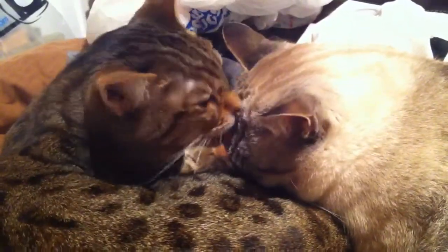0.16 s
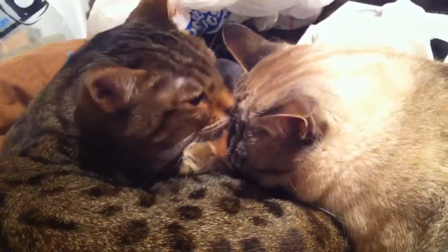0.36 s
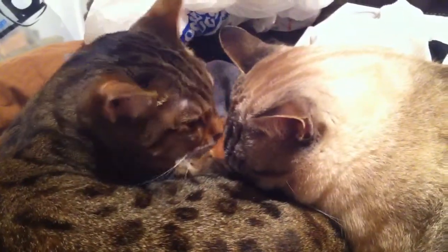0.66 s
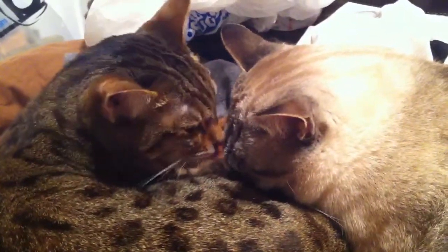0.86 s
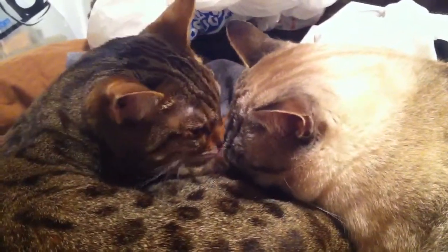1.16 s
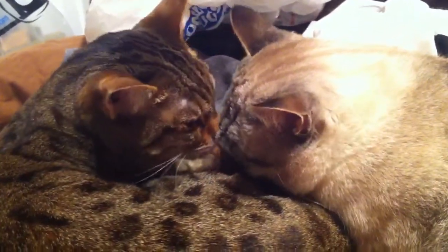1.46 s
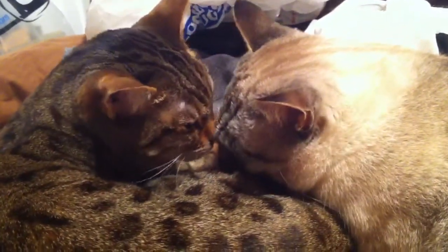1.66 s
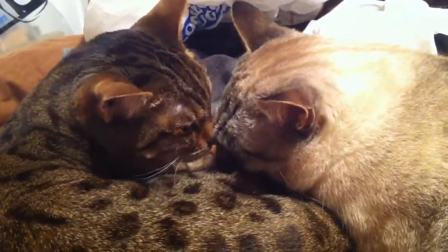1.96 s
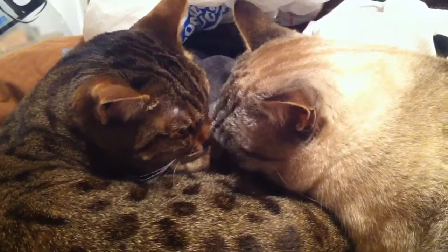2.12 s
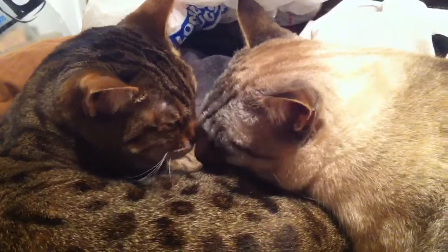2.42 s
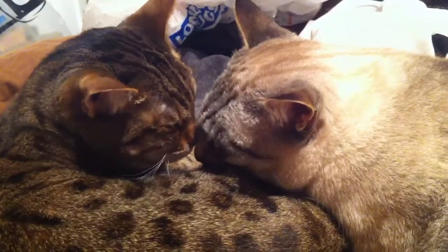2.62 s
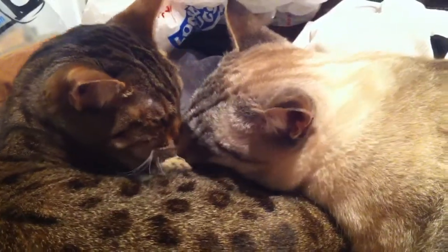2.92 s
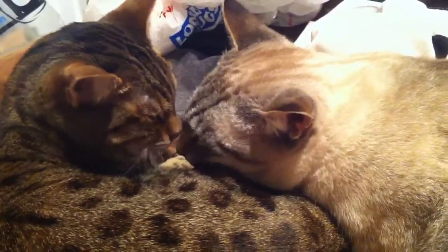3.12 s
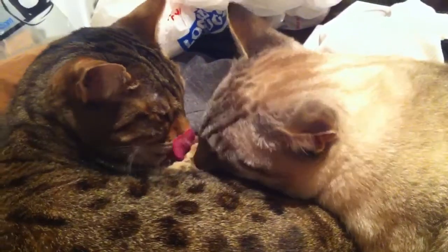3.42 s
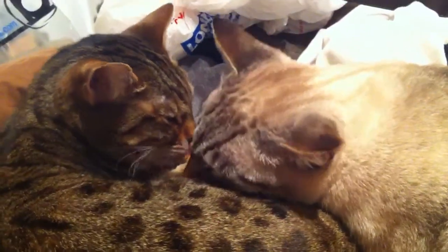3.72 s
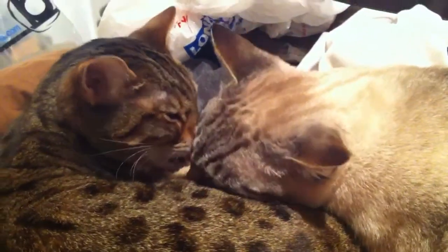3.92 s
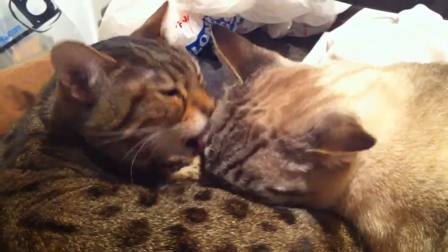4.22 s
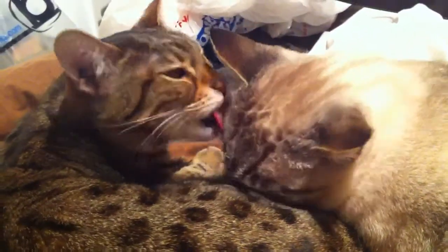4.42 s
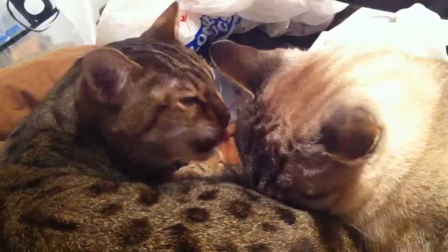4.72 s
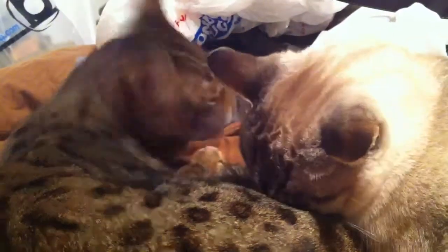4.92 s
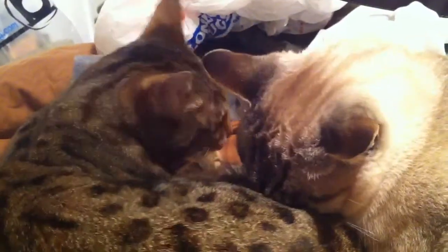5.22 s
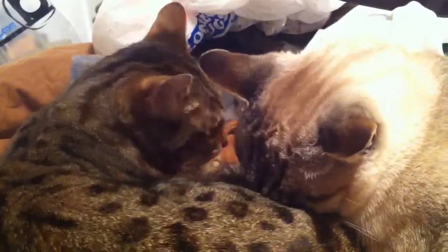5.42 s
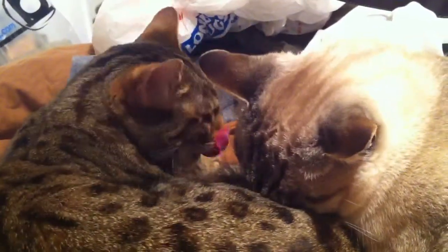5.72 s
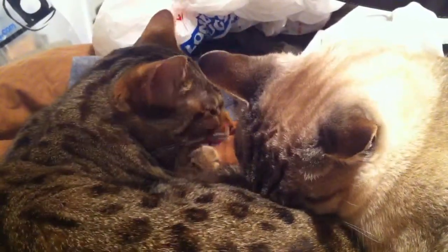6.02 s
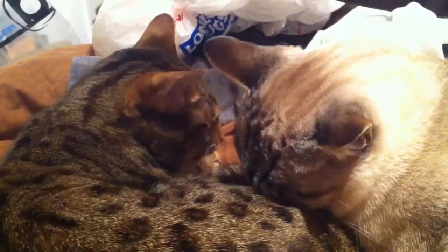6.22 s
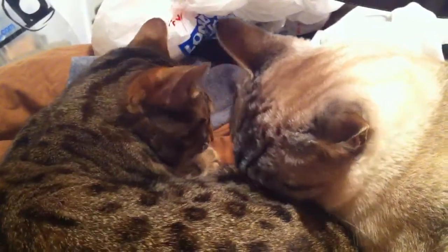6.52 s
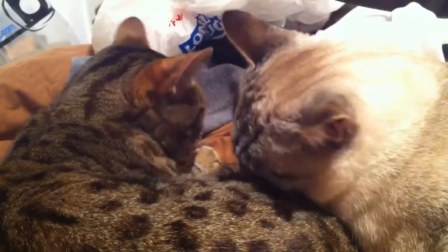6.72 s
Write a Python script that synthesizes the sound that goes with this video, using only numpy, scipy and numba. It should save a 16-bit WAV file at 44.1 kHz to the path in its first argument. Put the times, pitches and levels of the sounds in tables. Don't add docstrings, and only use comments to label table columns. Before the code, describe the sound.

Two cats lick fur with short wet rasping strokes close to the microphone, in a small soft room with a low steady motor hum.

```python
import sys
import numpy as np
from scipy import signal
from scipy.fft import rfft, irfft
from scipy.io import wavfile
from scipy.ndimage import uniform_filter1d
from numba import njit

SR = 44100
rng = np.random.default_rng(int(sys.argv[2]) if len(sys.argv) > 2 else 0)


def put_to_file(sound):
    columns = np.atleast_2d(sound).T
    safe = np.clip(columns, -1, 1)
    whole_steps = np.round(safe * 32767)
    wavfile.write(sys.argv[1], SR, whole_steps.astype(np.int16))


def volts_from_decibels(level):
    exponent = np.asarray(level, float) / 20
    return 10 ** exponent


N = 302967
LONGEST_S = 0.6


def unit(x):
    return x / np.sqrt(np.mean(x ** 2))


def coloured(points, size):
    hz, db = np.transpose(points)
    bins = np.maximum(np.fft.rfftfreq(size, 1 / SR), 1)
    gain = volts_from_decibels(np.interp(np.log(bins), np.log(hz), db))
    return unit(irfft(rfft(rng.standard_normal(size)) * gain, size))


def walk(rate, size):
    hold = int(SR / rate)
    steps = np.repeat(rng.standard_normal(size // hold + 1), hold)
    return unit(uniform_filter1d(steps, hold)[:size])


def place(sound, start_s):
    out = np.zeros(N + len(sound))
    out[int(start_s * SR):][:len(sound)] = sound
    return out[:N]


@njit
def resonance(x, hz, width):
    y, band, low = np.empty(len(x)), 0., 0.
    for i in range(len(x)):
        g = np.tan(np.pi * hz[i] / SR)
        k = width / hz[i]
        v = (band + g * (x[i] - low)) / (1 + g * (g + k))
        band = 2 * v - band
        low = low + 2 * g * v
        y[i] = k * v
    return y


def cavity(hz, width_hz):
    rough_db, slips_per_s, skirt = 1.4, 180, 2.5
    rub = rng.standard_normal(len(hz)) * volts_from_decibels(rough_db * walk(slips_per_s, size=len(hz)))
    ringing = resonance(rub, hz, 1. * width_hz)
    for _ in range(2):
        ringing = resonance(ringing, hz, skirt * width_hz)
    return unit(ringing)


def swell(start_s, length_s, hz, width_hz, level_db):
    t = np.arange(0, LONGEST_S, 1 / SR)
    shape = np.sin(np.pi * np.minimum(t / length_s, 1))
    hiss = cavity(np.full(len(t), 1. * hz), width_hz)
    return place(volts_from_decibels(level_db) * shape * hiss, start_s)


def air():
    # pitch_hz [Hz], level_db [dB per Hz]
    air_colour = [(20, -42), (55, -27.5), (85, -30.5), (110, -15), (145, -19), (220, -11.5), (380, -10),
                  (520, -17.5), (1650, -18), (3400, -28.5), (8000, -33), (10600, -36), (12500, -35.5),
                  (15700, -33.5)]
    return volts_from_decibels(-61.5 + 0.48 * walk(2.0, size=N)) * coloured(air_colour, size=N)


def hum():
    # multiple [of the base pitch], level_db [dB]
    hum_tones = [(1, -80), (2, -57), (3, -62.5), (4, -67.5), (5, -73.5), (6, -78.5), (7, -86), (9, -79.5)]
    motor_hz, turn_rad = 110.55, 0.25
    phase = 2 * np.pi * motor_hz * np.cumsum(1 + 0.001222 * walk(1.456, size=N)) / SR
    total = np.zeros(N)
    for multiple, level_db in hum_tones:
        gain = np.sqrt(2) * volts_from_decibels(level_db + 0.142 * multiple * walk(2.54, size=N))
        total += gain * np.sin(round(multiple) * phase + turn_rad)
    return total


def stirrings():
    # start_s [s], length_s [s], pitch_hz [Hz], width_hz [Hz],
    # level_db [dB]
    stirs = [
        (1.85, .55, 2430, 450, -71.5),
        (2.45, .35, 2150, 710, -75),
        (5.7, .35, 1800, 1700, -72),
        (6.6, .1, 1640, 100, -72),
        (2.63, .06, 3430, 150, -75),
        (2.62, .07, 4650, 250, -77),
    ]
    return sum(swell(*stir) for stir in stirs)


def squeak():
    start_s, length_s, pitch_hz, level_db = 2.635, 0.1, 1180, -66
    t = np.arange(0, length_s, 1 / SR)
    shape = np.sin(np.pi * t / length_s)
    return place(np.sqrt(2) * volts_from_decibels(level_db) * shape * np.sin(2 * np.pi * pitch_hz * t), start_s)


def mouth_rings():
    # start_s [s], length_s [s], pitch_hz [Hz], width_hz [Hz], level_db [dB]
    rings = [(0, 0.044, 6150, 250, -56.5), (1.19, 0.058, 7100, 1300, -44),
             (1.194, 0.058, 9700, 1700, -49.5), (1.202, 0.055, 4500, 870, -42),
             (1.336, .13, 4860, 1000, -61.5), (1.352, 0.072, 7550, 600, -58), (1.684, .05, 7070, 900, -44),
             (1.69, 0.074, 9140, 1500, -46.5), (1.694, 0.056, 14100, 700, -59),
             (1.698, 0.1, 9300, 1500, -50.5), (1.709, 0.053, 5520, 600, -29.5),
             (5.159, 0.12, 4270, 500, -58), (5.22, 0.045, 3690, 180, -46.5), (5.235, 0.082, 1950, 700, -59),
             (5.576, 0.022, 3900, 250, -40), (1.336, 0.047, 3560, 250, -45.5),
             (0.092, 0.023, 4100, 500, -49), (5.415, .14, 7900, 720, -59), (5.428, .08, 13000, 1000, -66),
             (5.492, 0.13, 3200, 81, -50.5), (5.552, 0.1, 4420, 250, -57.5),
             (5.546, 0.076, 15100, 700, -70), (5.567, 0.1, 7700, 1700, -65)]
    return sum(swell(*ring) for ring in rings)


def lick(stroke, lands_hz, curls_hz, balance_db, mouth, pockets_hz):
    # pitch_hz [Hz], level_db [dB]
    hair_colour = [(1300, -35), (2000, -5.5), (4000, -2), (7000, 2), (10000, -6), (12300, -6.5),
                   (13300, -17.5), (15500, -26)]
    lag_shares = (0.086, 0.67, 1.7, 1.46)
    curl_s, rise_power, fall_power, fall_end_db = 0.056, 1.77, 1.36, -32
    pocket_width_hz = 900.
    start_s, rise_s, lag_s, fall_s, level_db = stroke
    *widths_hz, rustle_db = mouth
    t = np.arange(0, LONGEST_S, 1 / SR)

    rises_s = np.maximum(rise_s + lag_s * np.array(lag_shares), 0.001)[:, None]
    rise = np.minimum(t / rises_s, 1) ** rise_power
    fall_db = fall_end_db * (np.maximum(t - rises_s, 0) / fall_s) ** fall_power
    gains = rise * volts_from_decibels(level_db + np.array(balance_db)[:, None] + fall_db)

    curl = 0.5 - 0.5 * np.cos(np.pi * np.minimum(t / curl_s, 1))
    sound = np.zeros(len(t))
    for land, curled, gain, width in zip(lands_hz, curls_hz, gains, widths_hz):
        sound += gain * cavity(land + (curled - land) * curl, width)
    effort = np.sqrt(np.sum(gains ** 2, axis=0))
    sound += effort * volts_from_decibels(rustle_db) * coloured(hair_colour, size=len(t))
    for hz in pockets_hz:
        sound = sound - resonance(sound, np.full(len(t), 1. * hz), pocket_width_hz)
    return place(sound, start_s)


def licks():
    # four widths_hz [Hz], hair rustle_db under the effort [dB]
    mouths = [(450, 260, 2200, 1800, -25), (284, 300, 340, 500, -7), (700, 530, 280, 830, -25),
              (700, 145, 550, 1500, -18), (180, 270, 450, 1900, -16), (800, 260, 400, 1000, -26)]
    pockets = [(4960, 10000, 13900), (6400, 6860, 13000), (7100, 11000, 18000), (5160, 9600, 12000),
               (4680, 6540, 9100), (5000, 8000, 9500)]
    # start_s [s], rise_s [s], upper hollows' extra rise (below 0: shorter rise) lag_s [s],
    # fall_s [s], level_db [dB]
    strokes = [(0, 0.0012, -0.013, 0.23, -49), (0.039, 0.032, 0.011, 0.16, -41),
               (1.176, 0.029, 0.021, 0.095, -32), (1.3, 0.036, -0.0027, 0.19, -49),
               (1.678, 0.018, 0.036, 0.066, -26.5), (5.164, 0.025, .004, 0.18, -56.5),
               (5.22, 0.0087, -0.0028, 0.15, -42.5), (5.281, 0.048, 0.0098, 0.19, -48),
               (5.413, 0.045, -0.018, 0.2, -46.5), (5.463, 0.013, 0.012, 0.21, -45),
               (5.553, 0.019, -0.0045, 0.17, -43), (6.775, 0.073, -0.00017, .08, -52.5)]
    lick_of = [0, 0, 1, 1, 2, 3, 3, 3, 4, 4, 4, 5]
    lands = [(3530, 4760, 7500, 12400), (3270, 4030, 7400, 12200), (2010, 4290, 3800, 8500),
             (2600, 3500, 5850, 13200), (1950, 3950, 5450, 12100), (1800, 4720, 6400, 12600),
             (1850, 3600, 6800, 10600), (2230, 2800, 6900, 10300), (2560, 3600, 4840, 9900),
             (2640, 3650, 5200, 10600), (2620, 4100, 6670, 11500), (1850, 3600, 7000, 9300)]
    curls = [(2980, 3870, 7200, 11600), (3670, 4240, 8200, 12300), (2780, 3570, 5900, 11800),
             (2520, 3450, 4000, 10600), (2370, 4550, 6185, 12300), (1800, 3400, 6240, 11400),
             (2100, 3400, 6900, 10400), (2100, 3000, 5750, 11800), (2650, 4000, 5150, 10900),
             (2590, 3620, 4700, 11400), (2580, 3980, 6150, 11750), (1880, 3200, 6520, 9400)]
    balance = [(-1, -2.5, -12.5, -17.5), (-4.5, -0.2, -21.5, -25), (-8, -3.7, -3, -12),
               (-6, -1.2, -16, -17), (-21.5, -2, 1.2, -16), (-30, 3, 2, -6), (-30, 1.1, -14, -20),
               (-9.5, 0.5, -19, -21), (-3.5, -20, 1, -21), (-10, 2.5, -7, -16), (-35, -2, -8.5, -14),
               (-21.5, -2, -11.5, -18)]
    total = np.zeros(N)
    for k, *parts in zip(lick_of, strokes, lands, curls, balance):
        total += lick(*parts, mouths[k], pockets[k])
    return total


def room(x):
    fade_s, treble_fade_s = 0.35, 0.25
    split_hz, gap_s = 9000, 0.004
    t = np.arange(SR // 2) / SR
    noise = rng.standard_normal(len(t))
    low = signal.sosfilt(signal.butter(2, split_hz, fs=SR, output="sos"), noise)
    tail = low * volts_from_decibels(-60 * t / fade_s) + (noise - low) * volts_from_decibels(-60 * t / treble_fade_s)
    tail = tail * (t > gap_s)
    return signal.fftconvolve(x, tail / np.sqrt(np.sum(tail ** 2)))[:N]


def scene():
    cats = stirrings() + squeak() + mouth_rings() + licks()
    return (volts_from_decibels(-0.5) * cats + volts_from_decibels(-6) * room(cats) + hum() + air())[None]


def band_limit(x):
    return signal.sosfilt(signal.butter(12, 15750, fs=SR, output="sos"), x)


def record(dry):
    return band_limit(dry)


dry = scene()
out = record(dry)
put_to_file(out)
```